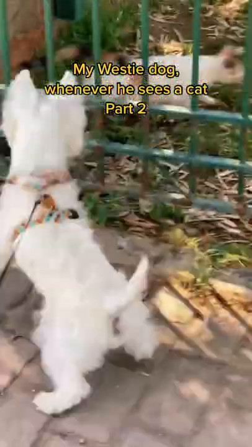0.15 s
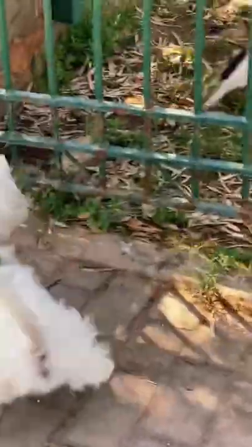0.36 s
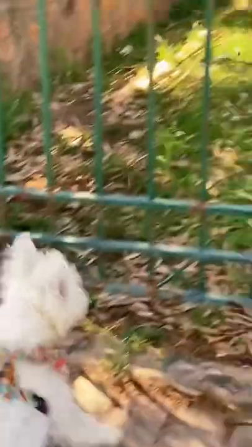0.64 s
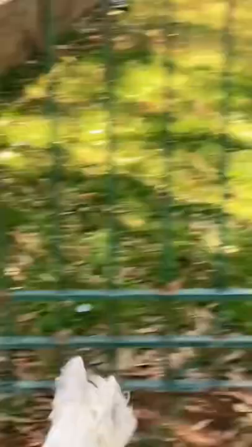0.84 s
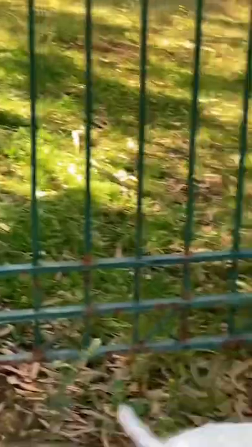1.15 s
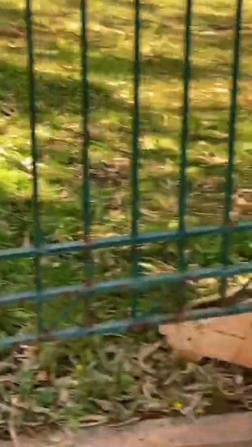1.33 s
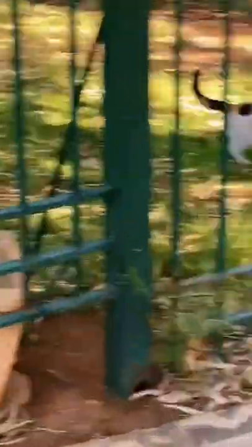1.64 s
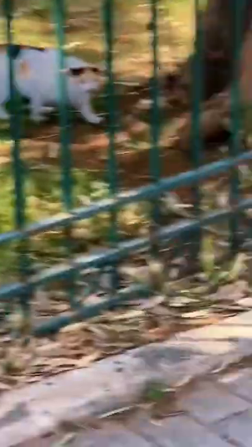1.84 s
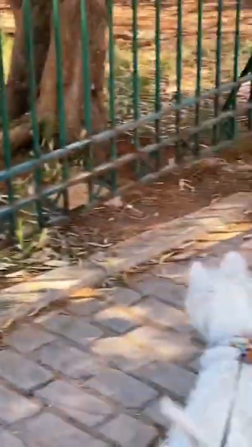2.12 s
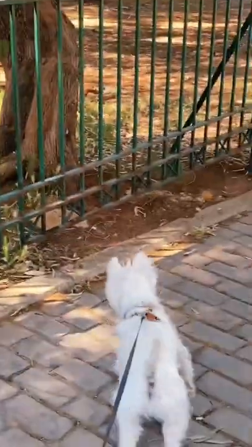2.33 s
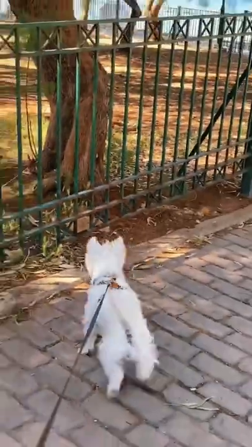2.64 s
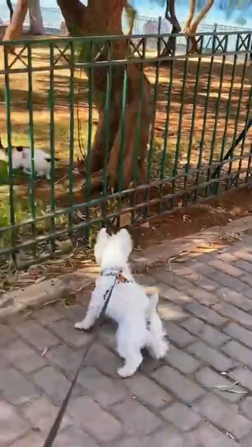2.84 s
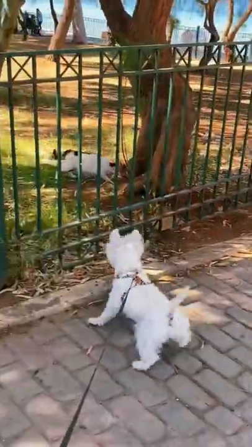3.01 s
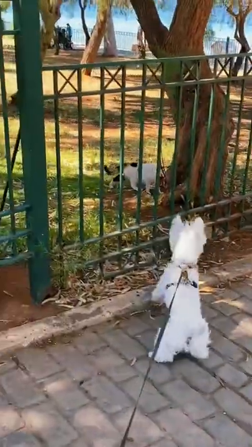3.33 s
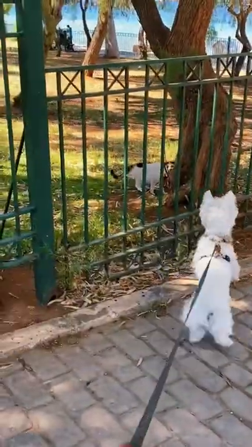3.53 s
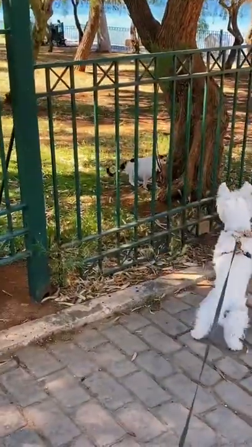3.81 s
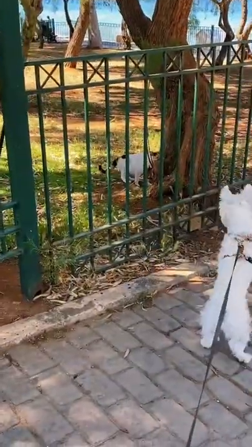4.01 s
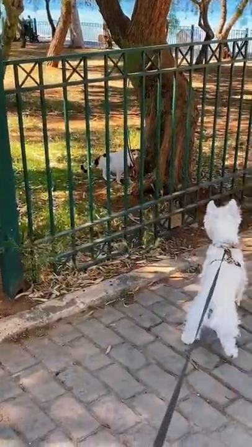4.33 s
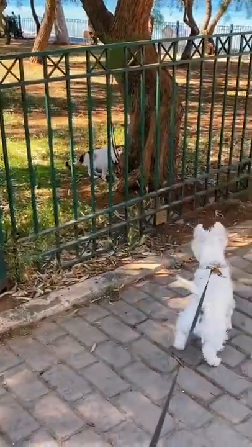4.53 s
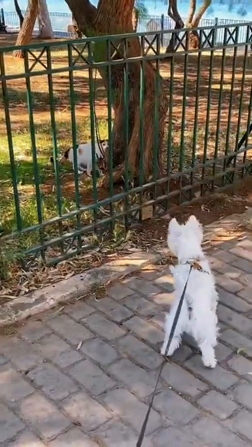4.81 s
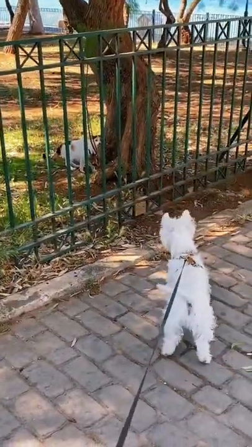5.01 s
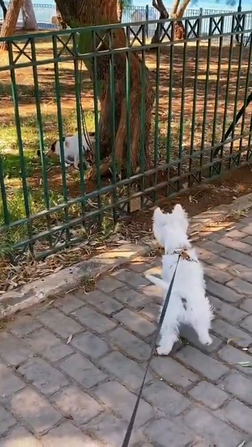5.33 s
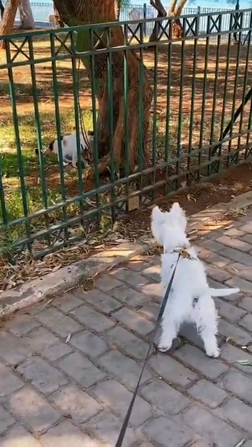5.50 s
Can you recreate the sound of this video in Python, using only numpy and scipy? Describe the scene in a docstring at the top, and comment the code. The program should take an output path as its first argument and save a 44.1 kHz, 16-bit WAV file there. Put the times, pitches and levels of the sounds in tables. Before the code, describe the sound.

High, excited yips and thin whimpers from a little dog outdoors, with light paw scrapes, leash ticks and a distant traffic rumble.

```python
"""A small terrier yips, whimpers and whines in a park: gliding partials plus breath hiss.
Paws and harness scuff the paving, the leash clip ticks, the collar tag clinks, something hollow knocks.
Distant traffic rumbles and hums, leaves rustle, a hand bumps the phone. Paving and walls answer faintly,
with a narrow ringing tail near 2.7 kHz; the phone's gain control ducks the background after loud yips."""
import sys
import numpy as np
from scipy import signal
from scipy.fft import rfft, irfft, next_fast_len
from scipy.io import wavfile
from scipy.ndimage import uniform_filter1d, minimum_filter1d, map_coordinates

SR = 44100
rng = np.random.default_rng(int(sys.argv[2]) if len(sys.argv) > 2 else 0)


def int16_out(signal):
    """Quantize to a 16-bit WAV file."""
    q = np.round(np.clip(np.atleast_2d(signal).T, -1, 1) * 32767)
    wavfile.write(sys.argv[1], SR, q.astype(np.int16))


N = 249606
T = np.arange(N) / SR

# leaf rustle and bright scrape spectrum: freq_hz, density_db
RUSTLE = [(1180, -21), (2000, -6), (4450, -2.5), (6940, -4), (9410, -22.5), (10900, -21.5), (12700, -10),
          (16000, -20)]
# balance of near sound at the two microphone ports: freq_hz, left_over_right_db
PORT_BALANCE = [(400, 0), (900, 6), (1500, 5), (2400, 0)]
SOFT_BRIGHT_DB, SOFT_FLUTTER_DB = 8, 2.6  # whines and whimpers


def amp(db):
    """Decibels to gain."""
    return 10 ** (np.asarray(db) / 20)


def unit(x):
    """Scale to rms 1."""
    return x / np.sqrt(np.mean(x ** 2) + 1e-20)


def along(points, hz):
    """Interpolate (freq_hz, value) points on a log axis."""
    f, v = np.transpose(points)
    return np.interp(np.log(hz + 1), np.log(f + 1), v)


def track(rows):
    """Samples a timed table covers, and its columns interpolated there."""
    times, *cols = np.transpose(rows)
    span = slice(max(round(times[0] * SR), 0), min(round(times[-1] * SR), N))
    return span, [np.interp(T[span], times, c) for c in cols]


def samples(start_s, length_s):
    """Samples of a call and time since its start."""
    span = slice(round(start_s * SR), round((start_s + length_s) * SR))
    return span, T[span] - T[span][0]


def wobble(rate_hz):
    """Smooth random curve, rate_hz knots a second."""
    return map_coordinates(rng.standard_normal(int(N * rate_hz / SR) + 4), [T * rate_hz])


def filtered(x, response):
    """Apply a complex frequency response."""
    m = next_fast_len(N + SR // 2)
    return irfft(rfft(x, m) * response(np.fft.rfftfreq(m, 1 / SR)), m)[..., :N]


def stereo_noise(spectrum):
    """Shaped noise of rms 1, partly alike at the two ports."""
    # left-right likeness: freq_hz, correlation
    likeness = [(240, 1), (950, 0.44), (3770, 0.94), (10000, 0.7), (15000, 1)]

    def mid_side(hz):
        angle = np.arccos(np.clip(along(likeness, hz), -1, 1)) / 2
        return amp(along(spectrum, hz)) * [np.cos(angle), np.sin(angle)]
    mid, side = filtered(rng.standard_normal((2, N)), mid_side)
    return unit(np.array([mid + side, mid - side]))


def tone(hz, rms_db, waver):
    """Soft-ended sine; waver is the relative pitch error."""
    n = np.arange(len(hz))
    edge = np.clip(np.minimum(n, n[::-1]) / (0.0027 * SR), 0, 1)
    return np.sqrt(2) * edge * amp(rms_db) * np.sin(2 * np.pi * np.cumsum(hz * (1 + waver)) / SR)


def park():
    """Traffic rumble, far city hiss, rustling leaves, a far idling engine and thin high tones."""
    # background levels: time_s, rumble_db, rustle_db
    levels = [(0, -41.5, -64.5), (.5, -44.5, -53.5), (1.301, -36, -55.5), (2, -38.5, -59),
              (2.799, -44, -72), (4.199, -44, -75), (5.66, -46.5, -80.5)]
    # traffic and city spectra: freq_hz, density_db
    rumble = [(20, -31.5), (54, 8.5), (75, 6.5), (231, -13.5), (390, -21), (660, -120)]
    city_hiss = [(88, -39.5), (150, -2.5), (1210, -12), (1860, -17.5), (2410, -18.5), (6840, -33.5),
                 (9000, -52.5)]
    # engine hum and one track per thin tone: time_s, pitch_hz, level_db
    engine_hum = [(0, 122.3, -42), (1.2, 132.7, -49.5)]
    thin_tones = [
        [(1.21, 3860, -65), (1.34, 4010, -54), (1.365, 4180, -37.5), (1.385, 4030, -65)],
        [(1.295, 1715, -55), (1.34, 1840, -50)],
        [(4.52, 3880, -59), (4.665, 3900, -56.5)],
        [(5.61, 3820, -56), (5.66, 3880, -66)],
    ]  # at 4.52 s: a thin high echo lingering after the loud yip
    times, *cols = np.transpose(levels)
    rumble_db, rustle_db = (np.interp(T, times, c) for c in cols)
    out = amp(rumble_db + 0.58 * wobble(5.1)) * stereo_noise(rumble)
    out += amp(-52.5 + 0.3 * wobble(42)) * stereo_noise(city_hiss)
    out += amp(rustle_db + 4.8 * wobble(18) + 3 * wobble(400)) * stereo_noise(RUSTLE)
    for rows in thin_tones + [engine_hum]:
        span, (hz, db) = track(rows)
        out[:, span] += tone(hz, db + 2.37 * wobble(70)[span], 0.0061 * wobble(150)[span])
    return out


def leash_clip():
    """Short bright cracks of high-passed noise."""
    # clip ticks: start_s, level_db
    ticks = [(.1875, -41), (.413, -37), (1.2995, -35), (1.607, -32), (2.0125, -44)]
    t60_s, highpass_hz = 0.018, 2980
    out, t = np.zeros(N), np.arange(SR // 20) / SR
    for start_s, db in ticks:
        out[round(start_s * SR):][:len(t)] += amp(db - 60 * t / t60_s) * rng.standard_normal(len(t))
    return filtered(out, lambda hz: 1j * hz / (highpass_hz + 1j * hz))


def scuffs():
    """Paws and harness spray grit: a bright scrape and a dull drag that swell and die."""
    # scuffs: start_s, level_db, drag_over_scrape_db, rise_s
    strokes = [(0.25, -38.5, -12, 0.0068), (0.275, -32, -10, 0.0084), (0.332, -37, 5, 0.0083),
               (0.3857, -28, -30, 0.0064), (0.4958, -29.5, -21, 0.0055), (0.5344, -29.5, -6.5, 0.0049),
               (0.8015, -32, 7, 0.0043), (0.923, -33, -26, 0.007), (1.297, -39, -4, 0.037),
               (1.504, -33, 0, 0.021), (1.583, -30.5, 1, 0.017), (1.6285, -29.5, -37, 0.0022),
               (1.739, -34.5, 3, 0.02), (1.838, -37, -17, 0.016), (1.902, -38, -5, 0.016),
               (2.406, -37.5, -11, 0.013), (2.697, -37, -7, 0.016), (3.507, -32.5, -2.5, 0.009)]
    # drag spectrum: freq_hz, density_db
    drag_spectrum = [(300, -6.5), (2000, -10), (5000, -45)]
    grains = amp(2.5 * np.minimum(rng.exponential(size=N // 40), 4)).repeat(40)
    grit = amp(0.75 * wobble(130)) * uniform_filter1d(np.pad(grains, (0, 40))[:N], size=30)
    scrape, drag = unit(grit * stereo_noise(RUSTLE)), unit(grit * stereo_noise(drag_spectrum))
    out = np.zeros((2, N))
    for start_s, db, drag_db, rise_s in strokes:
        span = slice(round(start_s * SR), round(start_s * SR) + SR // 4)
        u = (T[span] - T[span][0]) / np.clip(rise_s, .001, .03)
        envelope = amp(db - 13.0) * u ** 1.13 * np.exp(1 - u)
        out[:, span] += envelope * (scrape[:, span] + amp(drag_db) * drag[:, span])
    return out


def yip(start_s, climb_s, bend, hold_s, fall_s, catch, low_hz, top_hz, end_hz, bright_db, late, *peaks):
    """Pitch catches sharp, climbs, holds, moves to end_hz; upper partials fade most as the mouth shuts."""
    # throat colour on partials 1-3: freq_hz, gain_db
    throat = [(600, -3), (850, -13), (1050, -3.5), (1300, 2.5), (2050, -1), (2500, 1.5), (3300, -5.5),
              (4000, -12.5)]
    swell_db, fade_db, fade_bend = (18, 17.5, 22), (8.5, 24, 34.5), (0.41, 0.85, 1.4)
    catch_s = 0.0029
    length_s = climb_s + hold_s + fall_s
    span, t = samples(start_s, length_s)
    climb, fall = np.clip(t / climb_s, 0, 1), np.clip((t - climb_s - hold_s) / fall_s, 0, 1)
    hz = low_hz * (1 + catch * np.exp(-t / catch_s))
    hz += (top_hz - low_hz) * climb ** bend + (end_hz - top_hz) * fall ** 1.4
    catch_db = 32.5 * catch * np.exp(-t / (2 * catch_s))
    partial_db = []
    for k, (peak_s, db) in enumerate(peaks):
        before = np.clip(1 - t / peak_s, 0, 1)
        after = np.clip((t - peak_s) / abs(length_s - peak_s), 0, 1)
        arch_db = -swell_db[k] * before ** 2 - fade_db[k] * after ** (abs(late) * fade_bend[k])
        partial_db.append(db + catch_db + arch_db + along(throat, (k + 1) * hz))
    return span, hz, partial_db, bright_db, 0


def whine(rows):
    """Long wavering call, nearly one tone."""
    span, (hz, db, upper_db) = track(rows)
    return span, hz, [db, upper_db, upper_db], SOFT_BRIGHT_DB, SOFT_FLUTTER_DB


def whimper(start_s, length_s, first_hz, middle_hz, last_hz, *peak_db):
    """Pitch bends through three points; the level is one lopsided arch."""
    span, t = samples(start_s, length_s)
    u, crest = t / length_s, 0.66
    hz = np.polyval(np.polyfit([0, .5, 1], [first_hz, middle_hz, last_hz], 2), u)
    arch_db = -16.5 * np.where(u < crest, 1 - u / crest, (u - crest) / (1 - crest)) ** 3.45
    return span, hz, [db + arch_db for db in peak_db], SOFT_BRIGHT_DB, SOFT_FLUTTER_DB


def dog():
    """Twelve gliding partials, rougher when loud and as a call goes on, with breath hiss and huffs."""
    # yips: start_s, climb_s, climb_power, hold_s, fall_s, catch_share, low_hz, top_hz, end_hz,
    # bright_db, fade_lateness, then (peak_s, level_db) for partials 1-3
    yips = [(0.5876, 0.0354, 0.81, 0.016, 0.01, 0.011, 888, 1011, 838, -13.5, 3.3, (0.029, -17),
            (0.030, -13.5), (0.053, -20)),
            (0.9846, .045, 1.39, 0.0064, 0.023, 0.09, 831, 1080, 930, -9.5, 0.69, (0.041, -8), (0.05, -15),
            (0.04, -10)),
            (2.089, 0.036, 0.94, 0.01, 0.021, 0.0087, 766.5, 958.5, 975, -7.5, 0.54, (0.058, -18.5),
            (0.035, -25), (0.036, -20)),
            (2.605, 0.043, 3.1, 0.024, 0.018, 0.44, 956, 1102, 1037, 12.5, 1.25, (0.082, -21), (0.038, -23),
            (0.043, -21.5)),
            (2.826, .036, 1.9, 0.018, 0.025, 0.047, 952, 1220, 1036, -6.5, 1.94, (0.041, -11.5),
            (0.028, -12), (0.017, -16.5)),
            (3.048, 0.02, 2.3, 0.011, 0.0084, 0.0055, 634, 791.5, 680, -9.5, 1, (0.034, -21.5),
            (0.029, -22.5), (0.032, -30.5)),
            (3.566, 0.026, 1.7, 0.0053, 0.028, 0.025, 623, 622.4, 774, 5.5, 0.71, (0.031, -29),
            (0.029, -28.5), (0.045, -44.5)),
            (4.300, 0.048, 1.94, .016, 0.016, 0.12, 931, 1310, 940, -1, 2.1, (0.021, -14), (0.03, -11.5),
            (0.025, -16)), (5.020, .034, 3.04, 0.027, 0.024, 0.1, 965, 1317, 1060, 3, 0.87, (0.055, -10),
            (0.024, -13.5), (0.035, -18)),
            (5.516, 0.053, 3.4, 0.011, 0.016, 0.046, 828, 906, 780, -10, 1.2, (0.018, -24), (0.075, -31.5),
            (0.073, -37.5))]
    # one track per whine: time_s, pitch_hz, fundamental_db, partials_2_3_db
    whines = [
        [(0.653, 835, -29, -36), (0.68, 742, -36.5, -82), (0.72, 842, -29.5, -46.5), (0.755, 977, -31, -49),
         (0.782, 752, -40.5, -61)],
        [(5.168, 900, -54, -80), (5.22, 894, -41, -55), (5.3, 936, -42, -57.5), (5.36, 898, -40, -51.5),
         (5.4, 919, -37.5, -53.5), (5.44, 844, -40, -46), (5.489, 784, -43.5, -80)],
    ]
    # whimpers: start_s, length_s, first_hz, middle_hz, last_hz, fundamental_db, second_db, third_db
    whimpers = [(0.815, 0.024, 760, 880, 910, -36, -44.5, -62),
                (1.127, 0.058, 750, 960, 797, -30, -50, -71),
                (2.214, 0.047, 927, 1059, 960, -24.5, -44.5, -43.5),
                (3.808, 0.05, 783, 717, 823, -40, -65.5, -63),
                (3.898, 0.064, 791, 782, 742, -34, -52, -71.5),
                (4.436, 0.07, 754, 934, 796, -36.5, -55.5, -48),
                (4.659, 0.062, 824, 910, 912, -41, -45, -50)]
    # raspy huffs: start_s, length_s, level_db
    huffs = [(1.116, 0.21, -46.5), (2.224, 0.16, -39.5), (2.961, 0.24, -46)]
    # mouth response above partial 3: freq_hz, gain_db
    mouth = [(2200, -0.5), (4200, -22), (4750, -42), (5350, -29), (6500, -29), (7100, -44), (7800, -38),
             (9600, -60), (10600, -45), (11600, -64)]
    # breath spectrum: freq_hz, density_db
    breath_spectrum = [(500, -29.5), (1000, -13.5), (2200, -8.5), (4200, -16), (4800, -31), (5300, -27.5),
                       (6500, -30), (8200, -37.5), (16000, -68)]
    clean_db, hoarse_db = -52.5, -23.5
    voice, breath = np.zeros(N), np.zeros(N)
    jitter, shimmer = 0.0055 * wobble(350), [wobble(220) for _ in range(3)]
    flutter = [wobble(35) for _ in range(3)]
    calls = [yip(*row) for row in yips] + [whimper(*row) for row in whimpers]
    calls += [whine(rows) for rows in whines]
    for span, hz, partial_db, bright_db, flutter_db in calls:
        hz = uniform_filter1d(hz, size=250, mode="nearest")
        t = T[span] - T[span][0]
        effort = np.clip((np.max(partial_db) - clean_db) / (hoarse_db - clean_db), .35, 1.15)
        rough = effort * (0.35 + np.clip(t / 0.051, 0, 1))
        first_db, second_db, third_db = partial_db
        upper_db = 10 * np.log10(amp(first_db - 25.5) ** 2 + amp(second_db) ** 2 + amp(third_db) ** 2)
        dull_db = 59 * (1 - hz / hz.max())  # duller below the top pitch
        for k in range(1, 13):
            if k <= 3:
                db = partial_db[k - 1]
            else:
                db = upper_db + along(mouth, k * hz) + bright_db * min((k - 3) / 3, 1) - dull_db * (k > 4)
            db = db + flutter_db * min(k - .5, 1) * flutter[k % 3][span]
            shimmer_db = 1.49 * rough * min(k, 2.5) * shimmer[k % 3][span]
            voice[span] += tone(k * hz, db + shimmer_db, rough * jitter[span])
        loudness = np.sqrt(amp(first_db) ** 2 + amp(upper_db) ** 2)
        onset_puff = amp(upper_db.max() - 23.5 - 60 * t / 0.031)
        breath[span] = amp(-27.5) * rough * loudness + onset_puff
    for start_s, length_s, db in huffs:
        breath += amp(db) * np.sin(np.pi * np.clip((T - start_s) / length_s, 0, 1)) ** 2
    rasp = amp(0.36 * wobble(190))
    hiss = filtered(rng.standard_normal(N), lambda hz: amp(along(breath_spectrum, hz)))
    return voice + breath * unit(rasp * hiss)


def ports(x):
    """Direct sound reaches the two ports with a frequency-dependent balance."""
    def gains(hz):
        left = amp(along(PORT_BALANCE, hz) / 2)
        return np.array([left, 1 / left]) * 2 / (left + 1 / left)
    return filtered(x, gains)


def paving(x):
    """Ground echo, plus scattered copies that differ between the ports."""
    echo_s, t60_s = 0.0045, 0.21
    t = np.arange(round(0.044 * SR)) / SR
    scatter = unit(amp(-60 * t / t60_s) * rng.standard_normal(len(t))) / np.sqrt(len(t))
    spread = signal.fftconvolve(x, scatter)[:N]
    mid = spread[np.clip(np.arange(N) - 300, 0, N)]
    side = filtered(spread, lambda hz: along(PORT_BALANCE, hz) / 6)
    echo = np.roll(x, round(echo_s * SR))
    return amp(-14.5) * mid + amp(-25.0) * echo + amp(-8.5) * side * [[1], [-1]]


def ringing_tail(x):
    """Narrow ringing reverb tail near 2.7 kHz, heard after the loudest yips."""
    pitch_hz, width_hz = 2660, 3.5
    return filtered(x, lambda f: amp(2) * 1j * f * width_hz / (pitch_hz ** 2 - f * f + 1j * f * width_hz))


def walls(x):
    """Far reverberation, strongest in the treble; each frequency dies at its own rate."""
    # wall colour: freq_hz, gain_db
    colour = [(1000, -0.5), (2500, 0), (3800, 7), (6500, 13.5)]
    # wall decay: freq_hz, t60_s
    decay = [(1000, 0.84), (12000, 0.94)]
    hz, t, noise = signal.stft(rng.standard_normal((2, SR)), SR, nperseg=256)
    tail_db = along(colour, hz)[:, None] - 60 * t / along(decay, hz)[:, None]
    tail = signal.istft(noise * amp(tail_db), SR, nperseg=256)[1]
    tail = [[.9, 0.025], [.9, -0.61]] @ tail  # channels partly alike
    delayed = np.pad(x, (600, 0))[None]
    return signal.fftconvolve(delayed, tail / np.linalg.norm(tail[0]), axes=1)[:, :N]


def hollow_knock():
    """Something hard and hollow bounces; each contact rings its modes at new strengths."""
    # contacts: start_s, level_db
    contacts = [(0.8843, -18), (.8900, -26.5)]
    # hollow modes: freq_hz, gain_db, t60_s
    modes = [(447, -9.5, 0.026), (2006, 3.5, 0.013), (2670, -1, 0.012)]
    out, t = np.zeros(N), np.arange(SR // 10) / SR
    attack = 1 - np.exp(-t / 0.00035)
    for start_s, db in contacts:
        ring = sum(amp(db + gain_db + rng.normal(0, 2) - 60 * t / t60_s) * np.sin(2 * np.pi * hz * t)
                   for hz, gain_db, t60_s in modes)
        out[round(start_s * SR):][:len(t)] += attack * ring
    return out


def hand_bumps():
    """The hand on the phone: soft low thuds a few cycles long."""
    # thuds: start_s, level_db, pitch_hz
    thuds = [(1.298, -29, 87.5), (1.402, -20.5, 98), (1.478, -24, 86), (1.579, -28.5, 270),
             (1.624, -18, 101), (1.647, -19, 103), (1.754, -32, 308), (1.758, -20.5, 65.5)]
    out = np.zeros(N)
    for start_s, db, hz in thuds:
        n = np.arange(round((0.022 + 0.5 / hz) * SR))
        out[round(start_s * SR):][:len(n)] += amp(db) * np.hanning(len(n)) * np.sin(2 * np.pi * hz * n / SR)
    return out


def collar_tag():
    """Each clink rings the metal tag's modes at new strengths."""
    # clinks: start_s, level_db
    clinks = [(1.335, -60), (1.508, -56), (1.608, -56), (1.839, -54)]
    # tag modes: freq_hz, gain_db
    modes = [(7750, -14), (13954, -8.5), (15332, -10)]
    out, t60_s = np.zeros(N), 0.9
    for start_s, db in clinks:
        t = np.clip(T - start_s, 0, None)
        out += sum(amp(db + gain_db + rng.normal(0, 3) - 60 * t / t60_s) * np.sin(2 * np.pi * hz * t)
                   for hz, gain_db in modes)
    return out


def scene():
    """The dog and its reflections, small contacts and the park, in stereo."""
    voice = dog()
    terrier = ports(voice) + paving(voice) + ringing_tail(voice) + amp(-17.0) * walls(voice)
    return terrier + scuffs() + leash_clip() + hollow_knock() + collar_tag() + hand_bumps() + park()


def record(dry):
    """Gain control ducks just after loud sound, the bass most; then a peak limiter and a band limit."""
    threshold_db, lag_s, split_hz, treble_share = -14.0, 0.1, 900, 0.4
    ceiling, top_hz = 0.88, 15900
    power = uniform_filter1d(np.mean(dry ** 2, axis=0), size=880)
    level_db = 10 * np.log10(abs(power) + 1e-12)
    target_db = -1.6 * np.clip(level_db - threshold_db, 0, None)
    held_db = minimum_filter1d(target_db, size=7000)
    duck_db = np.pad(uniform_filter1d(held_db, size=1300), (round(lag_s * SR), 0))[:N]
    bass = filtered(dry, lambda hz: 1 / (1 + (hz / split_hz) ** 2))
    ducked = bass * amp(duck_db) + (dry - bass) * amp(treble_share * duck_db)
    limit_gain = ceiling / np.maximum(abs(ducked).max(axis=0), ceiling)
    limited = ducked * uniform_filter1d(minimum_filter1d(limit_gain, size=400), size=300)
    return filtered(limited, lambda hz: hz < top_hz)


dry = scene()
out = record(dry)
int16_out(out)
```